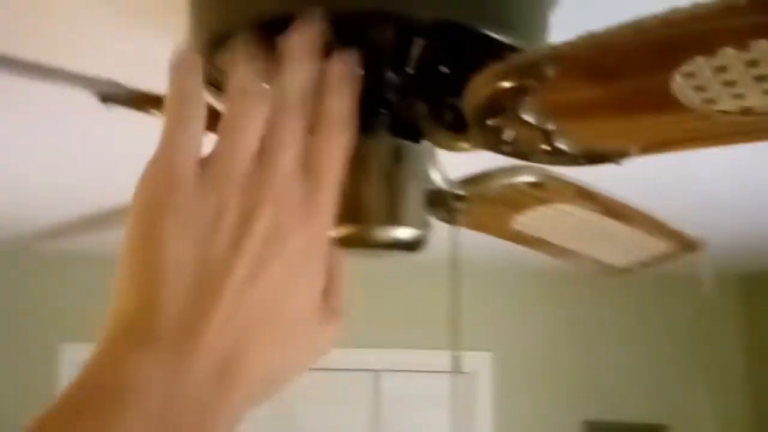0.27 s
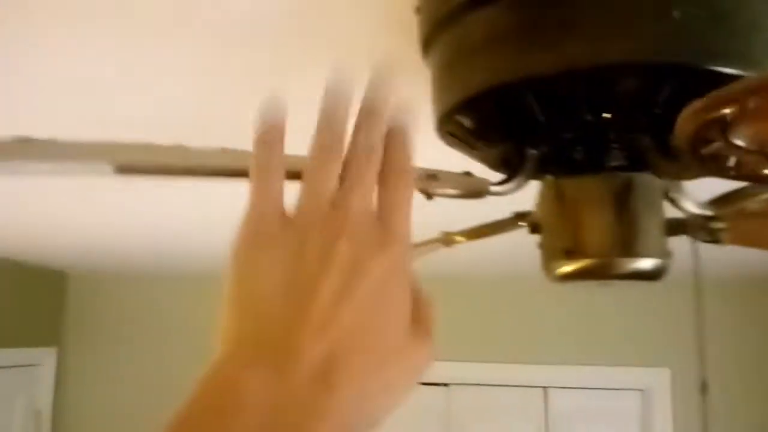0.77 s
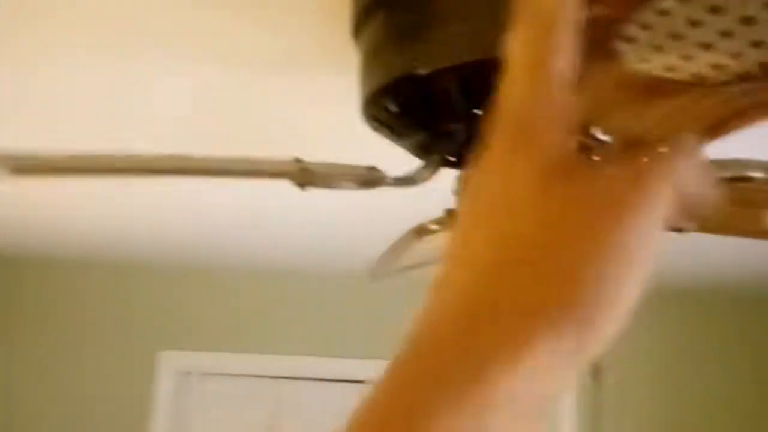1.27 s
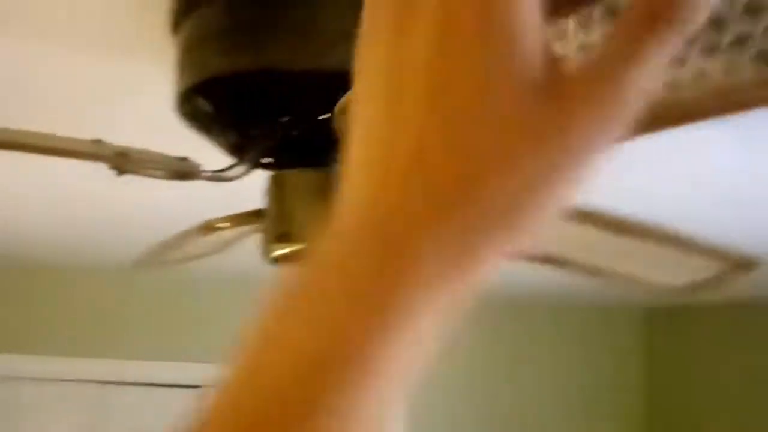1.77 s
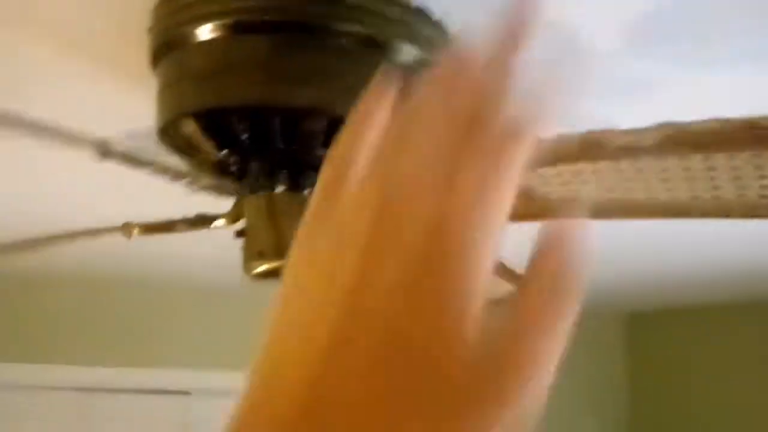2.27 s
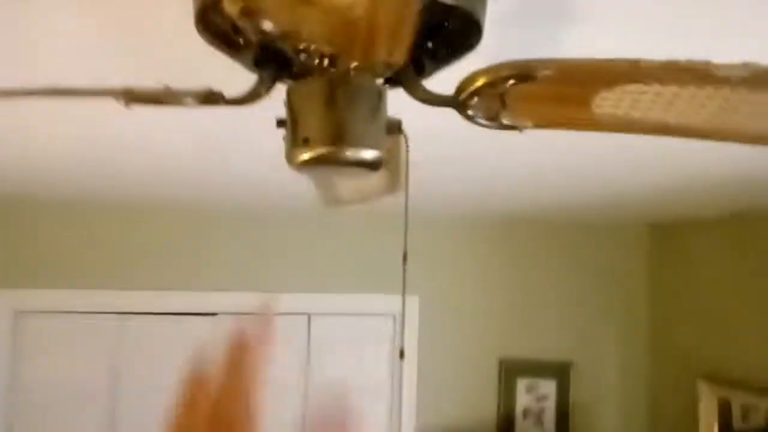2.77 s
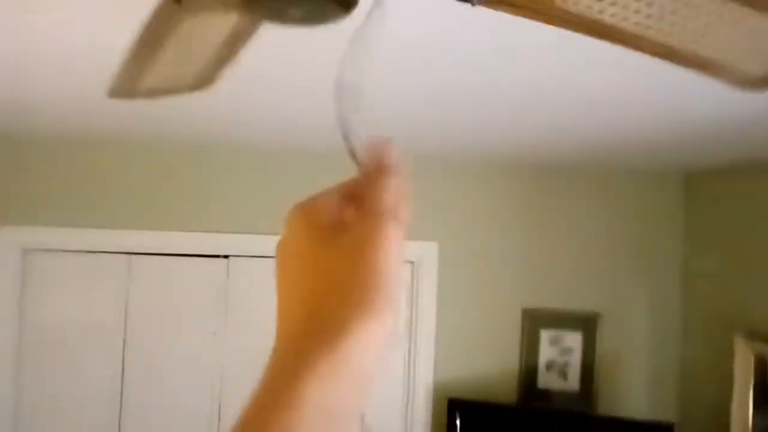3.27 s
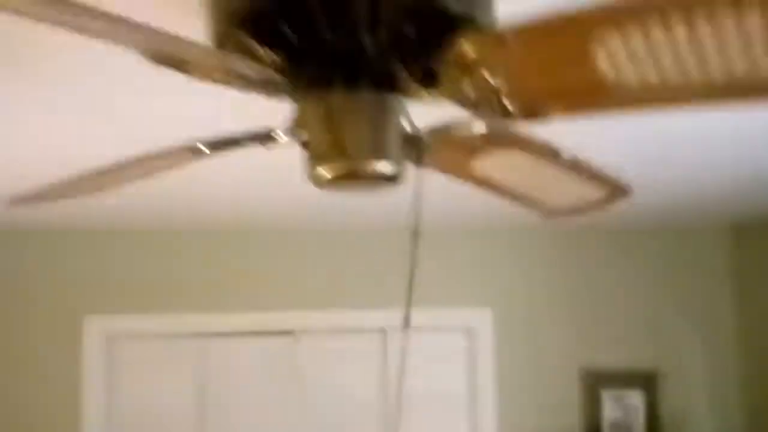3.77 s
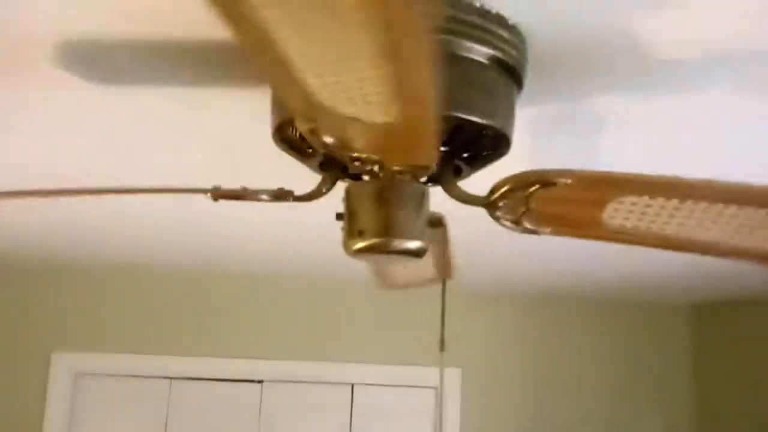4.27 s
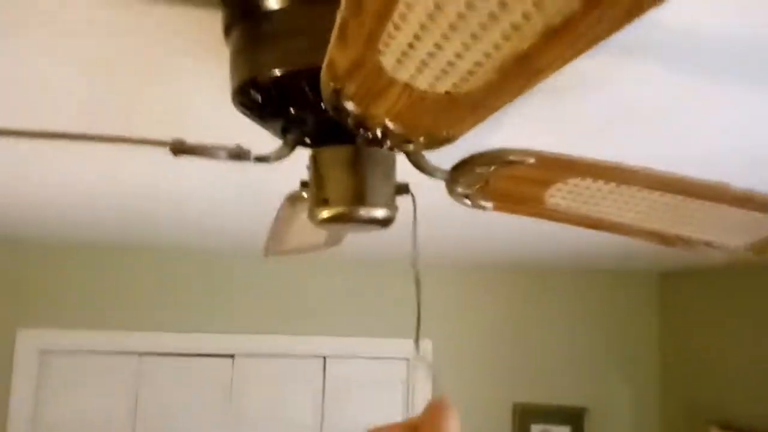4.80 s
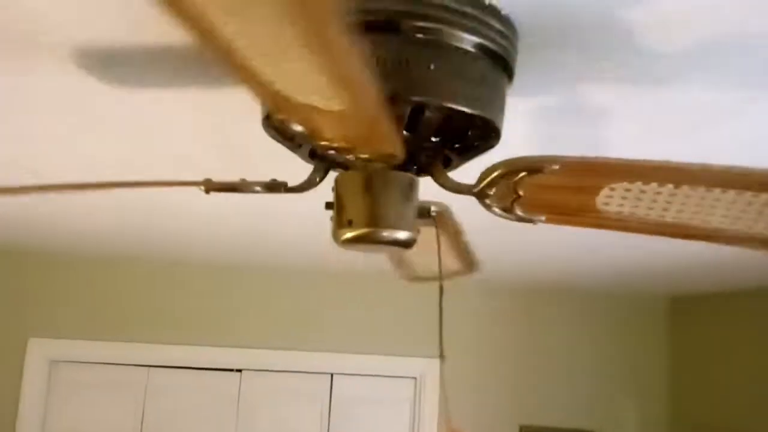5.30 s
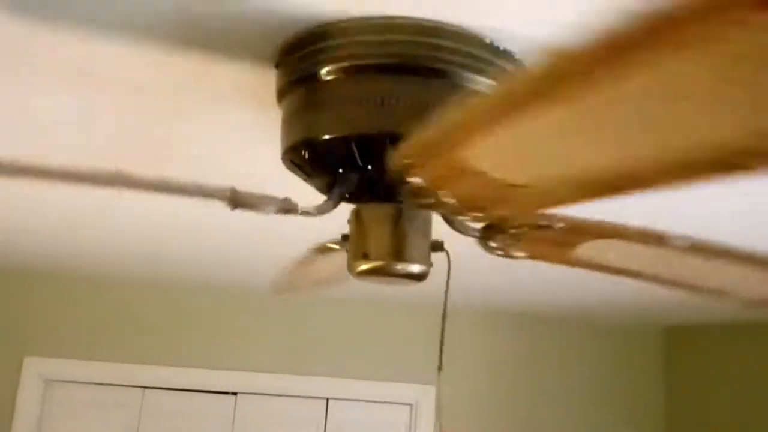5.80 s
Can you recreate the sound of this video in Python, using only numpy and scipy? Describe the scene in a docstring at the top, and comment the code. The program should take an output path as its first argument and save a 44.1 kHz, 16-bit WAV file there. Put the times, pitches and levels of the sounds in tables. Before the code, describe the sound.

Slow wooden fan blades thud and shudder against a hand, growing louder to a sharp slap, then a chain rustles and a switch snaps twice.

```python
"""Wooden blades of a slowly turning ceiling fan knock on a hand held in their path, in a small bedroom.
Each knock is a dull pop of a few cycles that rings the wood; the blade shudders and drags over the skin
as hissing, juddering noise, and fingertips flick off its edge as short noise bursts.
Then the hand pulls the bead chain: filtered specks of noise rustle, metal rasps in narrow noise bands, and
the switch snaps in and back out as bursts with ringing metal. A faint motor hum, a later rising tone and
soft noise lie behind."""
import sys
import numpy as np
from scipy import signal
from scipy.fft import rfft, irfft, next_fast_len
from scipy.io import wavfile

SR = 44100
rng = np.random.default_rng(int(sys.argv[2]) if len(sys.argv) > 2 else 0)


def dump_mix(stems):
    """Bounce the given channels to the path in sys.argv[1] as a 16-bit WAV at rate SR."""
    frames = np.atleast_2d(stems).T  # one column per channel
    limited = np.clip(frames, -1, 1)  # hard clip at full scale
    pcm = np.round(limited * 32767).astype(np.int16)
    wavfile.write(sys.argv[1], SR, pcm)


N = 266584
T = np.arange(N) / SR  # the time of every sample [s]

# a blade meets the hand: (time [s], knock level [dB], pitch on first finger [Hz], pitch on last finger [Hz],
#     loss per finger [dB], loss per overtone [dB], shudder level [dB], held [s], loss per rebound [dB],
#     skin hiss level [dB], wood judder level [dB])
BLADE_PASSES = [(.06, -72, 454, 470, -4, 22, -48.5, 0.049, 3, -74, -72),
                (0.344, -73.5, 410, 393, -5, 17, -40.5, .07, 13, -66, -73),
                (.531, -39, 472, 377, 6.5, 5, -36, 0.076, 18, -62.5, -44.5),
                (0.782, -71, 430, 410, -0.5, 10, -43.5, 0.014, 25, -78, -68),
                (.912, -38.5, 545, 438, 1.5, 13.5, -44.5, 0.076, 18, -68.5, -56),
                (1.066, -63, 443, 434, -3.5, 8, -36.5, .085, 19, -63.5, -60),
                (1.3384, -33, 692, 402, 4, 3.5, -44.5, 0.077, 31, -50.5, -57),
                (1.5649, -24, 534, 412, 4.5, 14, -33.5, 0.042, 7, -44.5, -50),
                (1.777, -30, 580, 830, 33, 30, -50.5, 0.083, 8, -59, -64),
                (1.9923, -27, 496, 1010, 5, 36, -26.5, .032, 9, -36, -55),
                (2.168, -25, 490, 970, 2.5, 7.5, -27, .062, 8, -37.5, -35.5)]
# the blade rolls over the fingers: (delay [s], share of the way from first to last pitch [0-1],
#     swell of the pop before the pocket lengthens it [cycles])
FINGERS = [(0, 0.01, 1), (.004, 0.66, 1.75), (.01, .35, 1.0), (.0145, 0.72, 2.2)]
# ringing of the wooden blade: (frequency [Hz], relative level [dB], time to fall 60 dB [s])
WOOD_MODES = [(235, -17, .24), (416, -9, .22), (452, -11, .11), (545, -18, .08), (655, -15, .1),
              (747, -17, .12), (850, -21, .12), (1044, -16, .18), (1238, -21, .1), (1335, -18, .13)]
# bending of a blade: (multiple of the shudder pitch [ratio], relative level [dB])
BENDING_MODES = [(0.562, -8), (0.737, -40), (1.004, 1), (1.358, -11.5), (1.902, -16), (3.296, -19)]
# skin sliding on wood: (frequency [Hz], level [dB])
SKIN_COLOUR = [(200, -9.5), (700, -11.5), (1400, -8.5), (2200, -8.5), (3400, -8), (4600, -3), (5600, -11),
               (6500, -25), (9000, -36), (15000, -42)]
# fingertips and nails flick off the edge: (time [s], level [dB], treble tilt [dB per octave])
FLICKS = [(0.066, -58, -12), (1.0997, -45, -7), (1.1646, -46, -1), (1.3397, -32, -20.5),
          (1.568, -29.5, -5.5), (1.6172, -34, -2.5), (1.7985, -41, -2.5), (1.829, -39, -1.5),
          (2.001, -22.5, 2), (2.0117, -22, -4.5), (2.0233, -38, 21), (2.1688, -32, 14), (2.1729, -14, -1.5),
          (2.1824, -12, -5), (2.1881, -22, 8)]
# spectrum of a flick before its tilt: (frequency [Hz], level [dB])
FLICK_COLOUR = [(300, -6), (900, -15), (1400, 4.5), (1900, -6.5), (2900, 9), (3900, 10.5), (4800, 13),
                (5850, 2), (6300, -8), (7600, -9.5), (8200, -16.5), (10500, -23), (15000, -90)]
# clicks of the pull switch, with an early echo of the first snap at 4.551 s:
#     (time [s], level [dB], treble tilt [dB per octave])
SWITCH_CLICKS = [(4.433, -50, -11.5), (4.477, -37, -9), (4.498, -39.5, -1), (4.511, -38, -12),
                 (4.519, -36.5, 6), (4.540, -15.5, 3.5), (4.551, -29, 4), (4.783, -36, 5.5),
                 (4.809, -32, -1.5), (4.8221, -16.5, 4.5)]
# spectrum of a click before its tilt: (frequency [Hz], level [dB])
SWITCH_COLOUR = [(200, -15), (700, -21.5), (1050, -9.5), (1400, 1), (1850, 2), (2300, 0), (3600, -3.5),
                 (4200, 10.5), (4800, -4.5), (5400, -15), (6200, -17.5), (8200, -19.5), (8700, -28.5),
                 (11500, -32), (15000, -47)]
# spring and lever inside the switch: (frequency [Hz], relative level [dB], time to fall 60 dB [s])
LEVER_MODES = [(1385, -12, 0.034), (2306, -13, 0.06), (3146, 0.5, 0.018), (4247, -2.5, 0.018),
               (4750, -16.5, .02), (5530, -12, 0.017), (6730, -14.5, 0.016), (7820, -50, 0.01)]
# metal switch housing: (frequency [Hz], relative level [dB], time to fall 60 dB [s])
HOUSING_MODES = [(1502, -35, .28), (1776, -35, .25), (2160, -33, .33), (2880, -34, .32), (3052, -33, .3),
                 (3203, -29, .35), (3720, -33, .25), (4010, -29, .25), (4067, -28, .32), (4148, -28, .3),
                 (4247, -28, .28), (4304, -26, .33), (4468, -34, .25), (4760, -31, .33), (4825, -33, .28),
                 (5650, -48, .22), (7750, -47, .3)]
# the bead chain is stirred: (time [s], level [dB], swell [s], treble tilt [dB per octave])
RUSTLES = [(2.955, -63, 0.029, -0.5), (3.13, -75.5, 0.069, -4), (3.299, -63.5, 0.015, -5),
           (3.499, -70.5, 0.072, -5.5), (5.471, -82.5, 0.033, -14.5)]
# spectrum of the rustling: (frequency [Hz], level [dB])
CHAIN_COLOUR = [(300, 1), (1000, -3), (1550, -21.5), (2300, 24), (3300, -0.5), (4000, 18), (4700, -19),
                (5500, 3), (6500, -34), (9700, -17), (15000, -20)]
# resonances of the beads and their fitting: (frequency [Hz], width [Hz], relative level [dB])
BEAD_RESONANCES = [(1575, 460, -6.5), (2037, 120, -8.5), (3046, 410, -4.5), (3770, 800, -4.5),
                   (4524, 1020, -1)]
# beads touch metal: (time [s], level [dB])
PINGS = [(3.72, -64.5), (4.146, -47.5)]
# metal rasps (chain, rattling fittings and creeping ratchet) as narrow noise bands:
#     (time [s], level [dB], frequency [Hz], width [Hz], swell [s])
METAL_RASPS = [(0.055, -53.5, 4450, 677, 0.012), (0.065, -66, 1490, 400, 0.017),
               (2.83, -70, 4500, 1100, 0.25), (3.63, -69.5, 3150, 160, 0.034),
               (4.202, -75, 2186, 150, 0.064), (4.22, -72.5, 4930, 350, 0.18),
               (4.467, -51.5, 1530, 386, 0.013), (4.777, -59.5, 5530, 333, 0.0097)]
# a tug rocks the fan on its mount: (time [s], level [dB], swell [s])
TUGS = [(2.96, -64.5, 0.041), (3.605, -54, 0.055), (3.725, -58, 0.011), (3.941, -61, 0.03),
        (4.545, -53, 0.046), (4.769, -63.5, 0.047)]
# spectrum of the rocking: (frequency [Hz], level [dB])
ROCKING_COLOUR = [(30, -26), (75, -1), (125, 10.5), (165, -6.5), (230, -14.5), (400, -31), (900, -73),
                  (3000, -59)]
# whirr as the freed fan gathers speed, before its random waver: (time [s], level [dB])
WHIRR_LEVEL = [(4.9, -72.5), (5.2, -74.5), (5.6, -77.5), (5.8, -68.5), (6.04, -74)]
# spectrum of the whirr: (frequency [Hz], level [dB])
WHIRR_COLOUR = [(60, -6.5), (170, -8.5), (250, -19), (300, 11.5), (370, -26.5), (520, -7), (720, -6.5),
                (920, 5), (1200, -4.5), (3000, -32), (8000, -62)]
# tone as the freed fan gathers speed, level before its waver: (time [s], pitch [Hz], level [dB])
MOTOR_TONE = [(4.9, 112, -90), (5.199, 130, -74.5), (5.5, 150, -83.5), (5.75, 163, -75),
              (5.901, 169.5, -72.5), (6.04, 171, -65.5)]
# spectrum of the background noise: (frequency [Hz], level [dB])
AIR_COLOUR = [(25, -24), (50, -3), (90, -1.5), (160, -6.5), (240, -10.5), (450, -11.5), (700, -11),
              (920, -7.5), (1300, -14.5), (3700, -19), (5200, -23.5), (6600, -31.5), (10000, -21),
              (15500, -23.5)]
# how long the room rings: (frequency [Hz], time to fall 60 dB [s])
ROOM_T60 = [(60, 0.54), (200, 0.84), (500, 0.33), (1500, 0.41), (4000, 0.38), (8000, 0.42), (15000, 0.07)]

OVERTONE_RATIO = 1.72  # between the pitches of the air pocket that a flat slap traps
POCKET_RING = 2.17  # a better sealed pocket has stronger overtones and rings longer
# pitch of the shudder at -40 dB; a harder push lowers it
FLEX_LAG_S, FLEX_HZ, FLEX_SAG_HZ_PER_DB = 0.01237, 130.9, 0.7
DRAG_LAG_S, DRAG_RISE_S, DRAG_SAG_DB, DRAG_RELEASE_T60 = 0.0026, 0.0058, 7.5, 0.18
BEADS_DB, RUSTLE_DB = -2, -3  # added to the chain's own levels
PING_HZ, PING_T60 = 9710, 0.088
HUM_HZ, HUM_DB = 97.7, -71.5  # centre of the hum's waver
AIR_DB = -67.5
ECHO_ONSET_S = .009  # the fade-in of the reflections is half done
CUTOFF_HZ = 15600


def knocks(count=3):
    """The blade meets one finger after another; flesh and trapped air give a dull pop of a few cycles."""
    pops, t = np.zeros(N), T[:SR // 20]
    for s, db, first_hz, last_hz, loss_db, dull_db, *_ in BLADE_PASSES:
        pocket_stretch = 1 + POCKET_RING * from_db(-dull_db) ** 2
        for finger, (delay, share, cycles) in enumerate(FINGERS):
            hz = first_hz * (last_hz / first_hz) ** share
            age = t * hz / (cycles * pocket_stretch)
            envelope = (age * np.exp(1 - age)) ** 2.5
            tone = sum(from_db(-k * dull_db) * np.cos(2 * np.pi * hz * OVERTONE_RATIO ** k * t)
                       for k in range(count))
            add(pops, s + delay, from_db(db - finger * loss_db) * envelope * tone)
    return pops


def blade(force):
    """The wooden blade rings under a force, as a set of dying tones."""
    t = T[:SR // 2]
    ringing = sum(from_db(db) * dying(t, t60) * np.sin(2 * np.pi * hz * t) * hz / SR
                  for hz, db, t60 in WOOD_MODES)
    return signal.fftconvolve(force, ringing)[:N]


def shudders(rise_s=0.012, sag_db=14.0, free_t60=0.35, waver=0.089, count=3):
    """The pressed blade vibrates in its bending modes, slips free and rebounds, weaker each time."""
    out, t = np.zeros(N), T[:SR // 2]
    for s, *_, db, held_s, loss_db, _, _ in BLADE_PASSES:
        hz = FLEX_HZ - FLEX_SAG_HZ_PER_DB * (db + 40)
        envelope = held(t, held_s, rise_s, sag_db, free_t60)
        for rebound in range(count):
            turns = hz * np.cumsum(1 + waver * drift(64.6)[:len(t)]) / SR
            bending = sum(from_db(mode_db) * np.sin(2 * np.pi * (multiple * turns + rng.random()))
                          for multiple, mode_db in BENDING_MODES)
            start = s + FLEX_LAG_S + rebound * held_s
            add(out, start, from_db(db - rebound * loss_db) * envelope * bending)
    return out


def drags(slip_hz=1000):
    """While a blade is held, skin sticks and slips in dense tiny steps: a hiss, and a dull judder in the wood."""
    skin, push, t = np.zeros(N), np.zeros(N), T[:SR // 2]
    for s, *_, held_s, _, hiss_db, judder_db in BLADE_PASSES:
        sliding = held(t, held_s, DRAG_RISE_S, DRAG_SAG_DB, DRAG_RELEASE_T60)
        add(skin, s + DRAG_LAG_S, from_db(hiss_db) * sliding)
        pressing = held(t, held_s, rise_s=.003, sag_db=14.5, t60=0.17)
        add(push, s, from_db(judder_db) * pressing)
    hiss = skin * rms_one(coloured(grains(per_s=4000, spread_db=0.5), SKIN_COLOUR))
    lowpass = signal.butter(2, slip_hz, fs=SR, output="sos")
    slips = signal.sosfilt(lowpass, grains(per_s=2300, spread_db=9.5))
    judder = blade(push * slips) / np.std(blade(slips))
    return hiss, judder


def flicks():
    """Sharp snaps as one finger after another leaves the blade."""
    out = np.zeros(N)
    for s, db, tilt in FLICKS:
        add(out, s, from_db(db) * crack(tilted(FLICK_COLOUR, tilt), t60=.011))
    return out


def switch(ring_db=1.5, lever_db=-7.0, crack_db=2.0):
    """The switch ticks, snaps over and springs back: noise bursts with ringing lever and housing."""
    clicks, rings = np.zeros(N), np.zeros(N)
    for s, db, tilt in SWITCH_CLICKS:
        add(clicks, s, from_db(db + crack_db) * crack(tilted(SWITCH_COLOUR, tilt), t60=0.022))
        add(clicks, s, from_db(db + lever_db) * struck(LEVER_MODES, tilt))
        add(rings, s, from_db(db + ring_db) * struck(HOUSING_MODES, tilt))
    return clicks, rings


def chain(flutter_db=-2.0):
    """Beads rustle and ring against each other, and two pings sound."""
    stirs = np.array([from_db(db) * swell(s, rise_s) for s, db, rise_s, _ in RUSTLES])
    tilts = np.array(RUSTLES)[:, -1]
    rustle = rms_one(coloured(grains(per_s=1300, spread_db=5.5), CHAIN_COLOUR))
    out = from_db(RUSTLE_DB) * stirs.sum(axis=0) * rustle
    for hz, width_hz, db in BEAD_RESONANCES:
        strength = from_db(BEADS_DB + db + lean(hz, tilts)) @ stirs  # all stirs, each with its own tilt
        out += strength * chatter(hz, width_hz) * from_db(flutter_db * drift(25.62))
    t = T[:SR // 2]
    ping = (1 - dying(t, 0.018)) * dying(t, PING_T60) * np.sin(2 * np.pi * PING_HZ * t)
    for s, db in PINGS:
        add(out, s, from_db(db) * ping)
    return out


def metal_rasps():
    """Chain, rattling fittings and creeping ratchet rasp as swelling narrow bands of noise."""
    return sum(from_db(db) * swell(s, rise_s) * chatter(hz, width_hz)
               for s, db, hz, width_hz, rise_s in METAL_RASPS)


def rocking_mount():
    """Each tug rocks the fan on its mount: a swell of low noise."""
    sway = sum(from_db(db) * swell(s, rise_s) for s, db, rise_s in TUGS)
    return sway * rms_one(coloured(rng.standard_normal(N), ROCKING_COLOUR))


def motor_hum():
    """The motor hums on one low tone that wavers in level and pitch."""
    loudness = from_db(HUM_DB + 2.9 * drift(4.4))
    turns = HUM_HZ * np.cumsum(1 + 0.024 * drift(13)) / SR
    return loudness * np.sqrt(2) * np.sin(2 * np.pi * turns)


def spin_up():
    """The motor's tone climbs as the fan gathers speed."""
    s, hz, db = np.transpose(MOTOR_TONE)
    turns = np.cumsum(np.interp(T, s, hz)) / SR
    loudness = from_db(np.interp(T, s, db) + 1.5 * drift(14))  # stays near its first level before the climb
    return loudness * np.sqrt(2) * np.sin(2 * np.pi * turns)


def whirr():
    """Blades stirring the air: coloured noise that wavers around a set course of levels."""
    noise = rms_one(coloured(rng.standard_normal(N), WHIRR_COLOUR))
    return level(WHIRR_LEVEL) * from_db(1.8 * drift(12)) * noise


def background_air():
    """A soft, steady background of coloured noise."""
    return from_db(AIR_DB) * rms_one(coloured(rng.standard_normal(N), AIR_COLOUR))


def room(x, wet_db):
    """Diffuse reflections that set in after the nearest wall and die band by band."""
    t = T[:SR * 3 // 4]
    white, hz = rfft(rng.standard_normal(len(t))), np.fft.rfftfreq(len(t), 1 / SR)
    edges = np.geomspace(30, SR / 2, 12)
    tail = np.zeros(len(t))
    for low, high in zip(edges, edges[1:]):
        band = irfft(white * (hz >= low) * (hz < high), len(t))
        tail += band * dying(t, at_hz(ROOM_T60, np.sqrt(low * high)))
    tail *= np.clip(t / ECHO_ONSET_S - .5, 0, 1)
    tail /= np.sqrt(np.sum(tail ** 2))
    return x + from_db(wet_db) * signal.fftconvolve(x, tail)[:N]


def crack(colour, t60):
    """A brief burst of micro-contacts, evened out in spectrum and then coloured."""
    t = T[:SR // 20]
    contacts = rfft(rng.choice([-1, 1], len(t)) * dying(t, t60))
    even = irfft(contacts / np.abs(contacts), len(t))
    burst = coloured(even * dying(t, .06), colour)
    return burst / np.sqrt(np.sum(burst ** 2) / (SR / 4000))  # every burst gets the same energy


def struck(modes, tilt, spread_db=5.0):
    """Metal modes ring from rest, each with a strength of its own at every blow."""
    t = T[:SR // 2]
    ringing = np.zeros(len(t))
    for hz, db, t60 in modes:
        strength = from_db(db + lean(hz, tilt) + spread_db * rng.standard_normal())
        ringing += rng.choice([-1, 1]) * strength * dying(t, t60) * np.sin(2 * np.pi * hz * t)
    return ringing * (1 - dying(t, 0.012))


def chatter(hz, width_hz):
    """Fine contacts keep a narrow metal resonance going; rms 1."""
    band = signal.butter(1, [hz - width_hz / 2, hz + width_hz / 2], "band", fs=SR, output="sos")
    contacts = grains(per_s=1500, spread_db=2.0) + 1e-18
    return rms_one(signal.sosfilt(band, signal.sosfilt(band, contacts)))


def grains(per_s, spread_db):
    """Random tiny contacts of uneven size."""
    hits = rng.random(N) < per_s / SR
    return hits * rng.standard_normal(N) * from_db(spread_db * rng.standard_normal(N))


def lean(hz, tilt):
    """Level change in dB around 4000 Hz; a harder contact has more treble and less bass."""
    return tilt * np.log2(np.clip(hz, 1400, 4700) / 4000)


def tilted(colour, tilt):
    """Lean a whole spectrum table toward treble or bass."""
    return [(hz, db + lean(hz, tilt)) for hz, db in colour]


def swell(s, rise_s):
    """A gesture that starts at s, peaks rise_s later and fades."""
    age = np.maximum(T - s, 0) / rise_s
    return age * np.exp(1 - age)


def held(t, held_s, rise_s, sag_db, t60):
    """Attack, a sagging hold while blade and hand touch, then release."""
    attack = 1 - np.exp(-t / rise_s)
    sag = from_db(-sag_db * np.minimum(t / held_s, 1))
    return attack * sag * dying(np.maximum(t - held_s, 0), t60)


def dying(t, t60):
    """Exponential decay that falls 60 dB in t60 seconds."""
    return np.exp(-np.log(1000) * t / t60)


def drift(rate):
    """Random wander along straight lines between points, rate points per second, of spread about 1."""
    knots = np.arange(0, T[-1] + 1, 1 / rate)
    return np.interp(T, knots, rng.standard_normal(N)[:len(knots)])


def coloured(x, colour):
    """Filter with the given spectrum that never sounds ahead of its input (minimum phase)."""
    size = next_fast_len(len(x) + 4096, True) // 2 * 2
    cepstrum = irfft(np.log(from_db(at_hz(colour, np.fft.rfftfreq(size, 1 / SR)))))
    # folding the second half onto the first gives the minimum-phase response
    cepstrum[1:size // 2] *= 2
    cepstrum[size // 2 + 1:] = 0
    return irfft(rfft(x, size) * np.exp(rfft(cepstrum)))[:len(x)]


def at_hz(points, hz):
    """Read a table on a log-frequency axis."""
    f, value = np.transpose(points)
    return np.interp(np.log(np.maximum(hz, 1)), np.log(f), value)


def level(rows):
    """Gain over time from (s, dB) rows; silent before the first and from 0.05 s after the last."""
    s, db = np.transpose(rows)
    return from_db(np.interp(T, s, db)) * (T > s[0]) * (T < s[-1] + .05)


def from_db(db):
    """Decibels to gain."""
    return 10 ** (np.asarray(db) / 20)


def rms_one(x):
    """Scale to unit rms, an average strength of 1."""
    return x / np.sqrt(np.mean(x ** 2) + 1e-20)


def add(track, s, sound):
    """Mix a sound into a track at time s."""
    i = max(int(s * SR), 0)
    track[i:i + len(sound)] += sound[:N - i]


def scene(blade_db=1.5):
    """The hand is close, with little room sound; the switch clicks carry much more of the room."""
    pops = knocks()
    hiss, judder = drags()
    clicks, housing = switch()
    wood = room(pops, wet_db=-13.5) + from_db(blade_db) * blade(pops) + judder + shudders()
    fingers = room(flicks() + hiss, wet_db=-14.0)
    metal = room(clicks, wet_db=-2.5) + housing + room(chain() + metal_rasps(), wet_db=-6.0)
    fan = rocking_mount() + motor_hum() + spin_up() + whirr()
    return (wood + fingers + metal + fan + background_air())[None]


def record(dry):
    """The treble is cut steeply above the cutoff."""
    lowpass = signal.ellip(12, .1, 70, CUTOFF_HZ, fs=SR, output="sos")
    return signal.sosfilt(lowpass, dry)


dry = scene()
out = record(dry)
dump_mix(out)
```